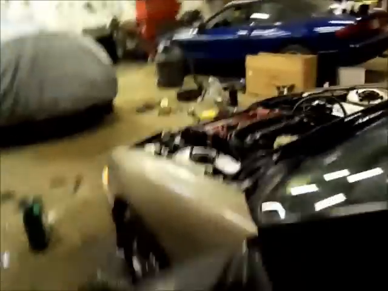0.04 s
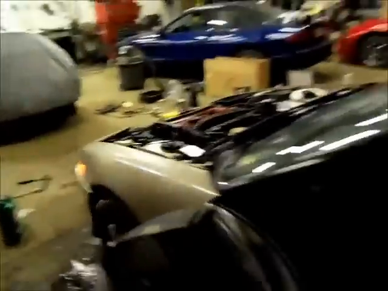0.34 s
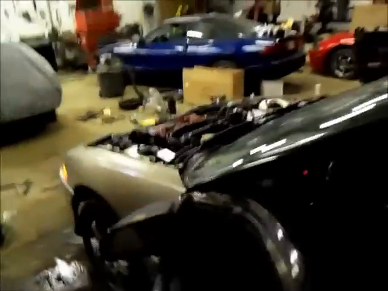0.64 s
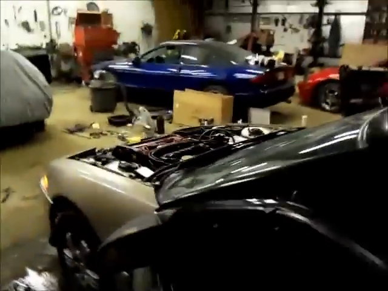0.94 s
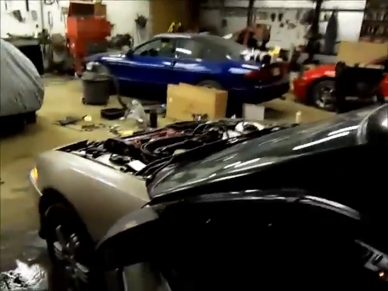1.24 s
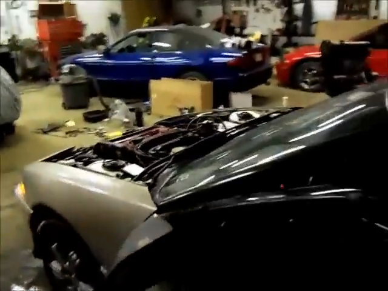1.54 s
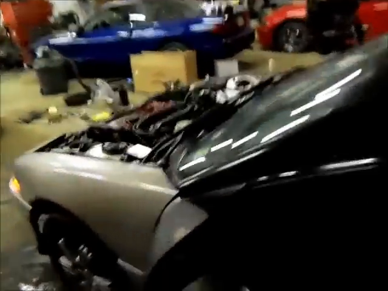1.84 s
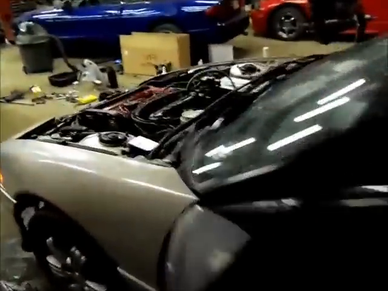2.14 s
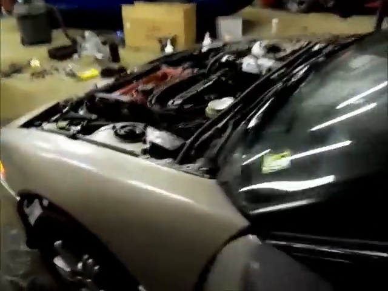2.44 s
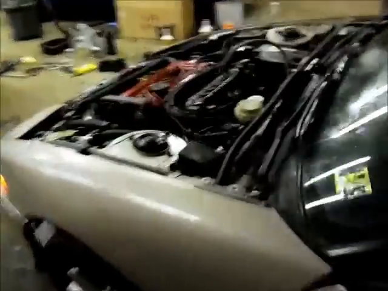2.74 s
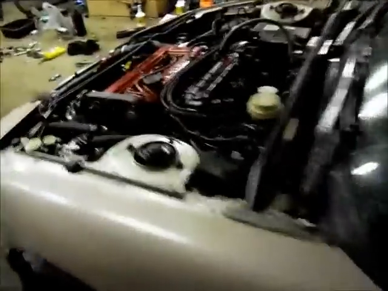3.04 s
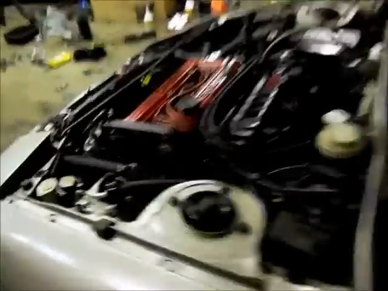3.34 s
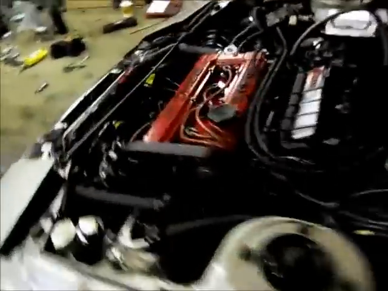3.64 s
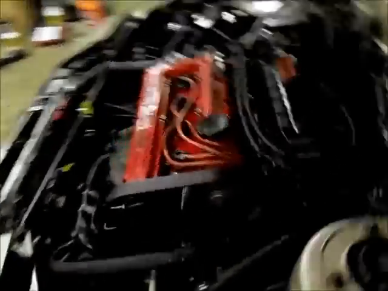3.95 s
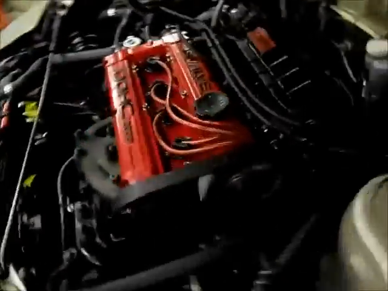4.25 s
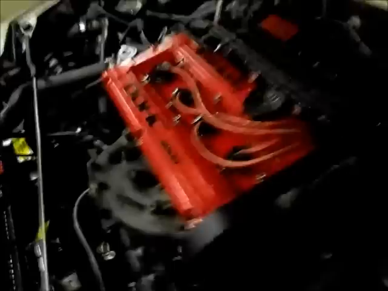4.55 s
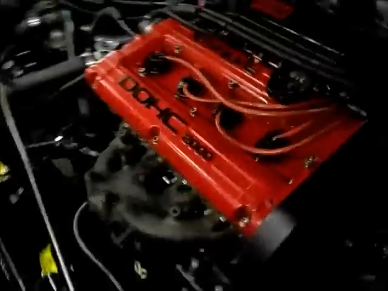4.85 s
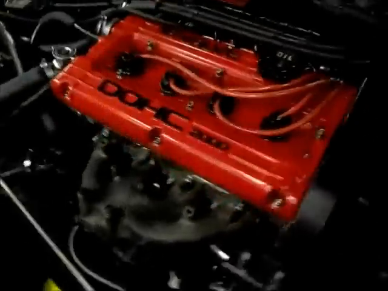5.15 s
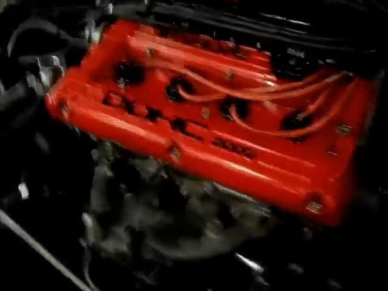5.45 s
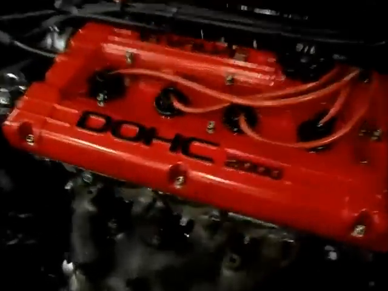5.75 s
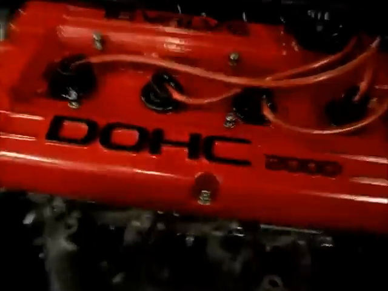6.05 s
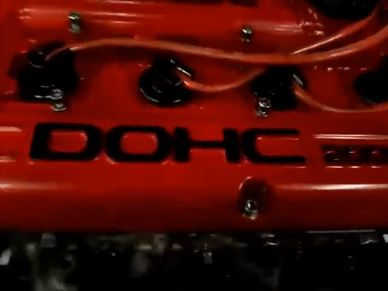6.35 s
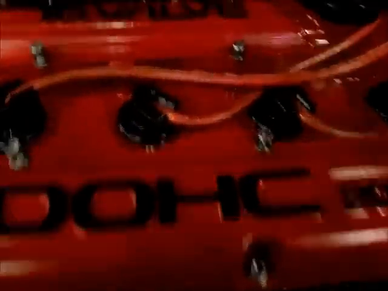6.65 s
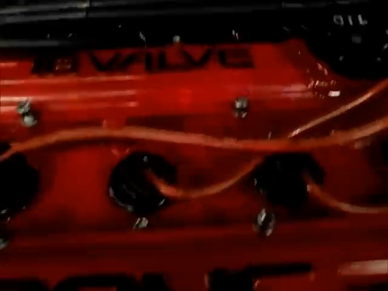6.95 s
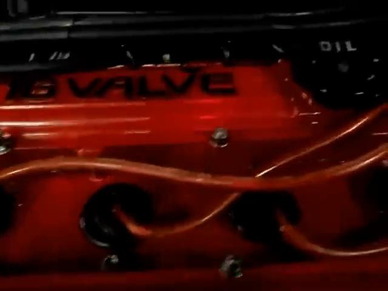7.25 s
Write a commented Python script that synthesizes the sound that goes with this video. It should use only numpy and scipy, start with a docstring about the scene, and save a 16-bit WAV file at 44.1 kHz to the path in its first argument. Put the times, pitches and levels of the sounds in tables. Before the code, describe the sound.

After one brief scuff at the start, a car engine keeps idling with a low hum and a quick, regular metallic tick that echoes slightly in a garage. The microphone walks past the wing and leans into the open engine bay, so the ticks become crisper and more direct and the belts hiss more clearly. A thin whine swells and fades halfway through, while the idle speed wavers only a little.

```python
"""Fast idle in a garage, bonnet open.

The microphone walks from the door, over the wing, to the valve cover of a four-cylinder engine.
The exhaust drones with the firings. One loose lifter ticks once per camshaft turn, ringing the cover
and echoing in the bay and the garage. The other valves patter, belts hiss and whine, the block rumbles.
Something scuffs once near the start."""
import sys
import numpy as np
from scipy import signal
from scipy.fft import rfft, irfft, next_fast_len
from scipy.io import wavfile

SR = 44100
rng = np.random.default_rng(int(sys.argv[2]) if len(sys.argv) > 2 else 0)


def store_pcm(level_fs):
    """Save levels as 16-bit WAV."""
    pcm = np.round(np.clip(level_fs, -1, 1) * 32767).astype(np.int16)
    wavfile.write(sys.argv[1], SR, np.atleast_2d(pcm).T)


N = 326781
TIME = np.arange(N) / SR
GARAGE_T60_S = 0.48
# modes of the valve cover: f/Hz, level/dB, t60/s, gain with the microphone leaning in/dB
COVER_MODES = [(512, -17.5, 0.027, -11), (747, -16, 0.035, -23), (862, -24, 0.04, 2),
               (1269, -9, 0.029, -16.5), (1346, -18.5, 0.022, 8), (1730, -10.5, 0.0061, 0.5),
               (2005, -14, 0.026, 2.5), (2256, -13.5, 0.021, 1), (2690, -1.5, 0.011, 0),
               (2890, -3.5, 0.012, 4), (3030, -4.5, 0.011, 5), (3646, -12, 0.012, -1),
               (4100, -8.5, 0.0048, 1.5), (5135, -9.5, 0.0073, -2), (5740, -18, 0.022, -3),
               (7100, -15, 0.0046, 4), (9600, -16, 0.0064, -1)]


def exhaust(cam, place, lope_db_per_place=-1.5, waver_db=2.5, wander_rad=0.38):
    """Four firings per camshaft turn; unequal cylinders add a lope at multiples of the camshaft rate."""
    # second order, booming and fading through the garage's standing wave: t/s, level/dB
    boom = [(0.0, -18.5), (0.47, -22.5), (1.28, -21.5), (2.23, -24), (3.46, -18), (4.17, -22), (4.62, -20),
            (5.61, -25), (7.16, -21.5), (7.41, -23.5)]
    # first and third order: multiple of the firing rate, level/dB at door, wing, cover
    drone_orders = [(1, -24.5, -25, -38), (3, -24, -28.5, -34.5)]
    # weaker, wavering orders: same columns
    weak_orders = [(4, -47.5, -34.5, -54), (5, -49.5, -48.5, -50), (6, -54, -44, -63), (7, -48, -52.5, -61),
                   (9, -62.5, -57.5, -84), (14, -58.5, -53, -56.5), (18, -62, -51, -84)]
    # spectrum of the uneven firing: f/Hz, level per line/dB
    lope_spectrum = [(22, -68), (33, -53), (55, -45.5), (76, -48), (100, -38.5), (120, -48), (160, -45.5),
                     (200, -57.5), (290, -58.5), (360, -82)]
    # the firings fall later against the tick as the microphone nears the cover
    firing = 2 * np.pi * (4 * cam + np.interp(place, [0, 1, 2], [.25, 0, -.1]))
    # the standing wave holds back the second order, except over the engine
    lag = np.interp(place, [0, 1, 2], [.95, .95, 0])
    drone = from_db(in_time(boom)[0]) * np.cos(2 * firing - lag)
    for order, *levels_db in drone_orders:
        drone += by_place(place, levels_db) * np.cos(round(order) * firing)
    for order, *levels_db in weak_orders:
        gain = by_place(place, levels_db) * from_db(waver_db * drift(1.13))
        drone += gain * np.cos(round(order) * firing + wander_rad * drift(4.6))
    cam_hz = (cam[-1] - cam[0]) * SR / N
    lope = 0
    for k in range(2, 33):
        if k % 4:  # only the lines between the firing orders
            phase = 2 * np.pi * (k * cam + rng.random()) + 1.12 * drift(2.04)
            lope += from_db(at_hz(lope_spectrum, k * cam_hz)) * np.cos(phase)
    return np.sqrt(2) * (drone + from_db(lope_db_per_place * place) * lope)


def lifter(cam, place, lean, strike_db=7.5, uneven_db=0.63, touch_db=-8.0, slack_s=0.00128,
           wander_db=0.6, bay_db=-3.0, bay_t60_s=0.059):
    """The cam takes up the slack with a touch, then the valve is struck; both ring the cover and bay."""
    # the tick along the walk: gain/dB at door, wing, cover
    tick_gains_db = (-31.5, -23.5, -20.5)
    # the ticking slackens for a moment: t/s, half-length/s, gain/dB
    lulls = [(.72, .25, -5), (4.28, 0.17, -2), (5.97, .1, -3)]
    times = tick_times(cam)
    force_db = strike_db + uneven_db * rng.standard_normal(len(times))
    gap_s = slack_s + 6e-5 * rng.standard_normal(len(times))
    cover = 0
    for k, (hz, mode_db, t60, lean_db) in enumerate(COVER_MODES):
        touch, strike = from_db(force_db + mode_db + rng.standard_normal((2, len(times))))
        blows = click_train(times, touch * from_db(touch_db)) + click_train(times + gap_s, strike)
        gain = from_db(lean_db * lean + wander_db * drift(0.78))
        cover += (-1) ** k * gain * ring(blows, hz, t60)
    cover *= by_place(place, tick_gains_db) * swells(lulls)
    # the pattern of reflections changes as the microphone moves
    angle = np.pi / 2 * (place + .5 * drift(0.52))
    bay = np.cos(angle) * echoes(cover, bay_t60_s, .001491)
    bay += np.sin(angle) * echoes(cover, bay_t60_s, .0025)
    # from the door the cover is hidden and mostly the reflections arrive
    direct = cover * by_place(place, [-11.0, -1.0, 0.0])
    return direct + from_db(bay_db) * bay * by_place(place, [0.0, 1.5, -2.5])


def garage_ticks(cam, place, room_db=-27.5, dull_hz=4000, pip_hz=1260, pip_db=-36.5):
    """The ticks fill the garage, dulled, wherever one stands; the engine bay adds a hollow pip."""
    times = tick_times(cam) + 0.001977
    blows = lambda db: click_train(times, from_db(db + rng.standard_normal(len(times))))
    cover = sum(ring(blows(room_db), hz, t60) * from_db(db) for hz, db, t60, _ in COVER_MODES)
    dulled = signal.sosfilt(signal.butter(2, dull_hz, fs=SR, output="sos"), cover)
    angle = 1.5 * drift(1.5)  # the pattern of the near reflections keeps shifting
    near = np.cos(angle) * echoes(dulled, .15, .002) + np.sin(angle) * echoes(dulled, .15, .003)
    room = near + from_db(-3.0) * echoes(dulled, GARAGE_T60_S, .012)
    pip = echoes(ring(blows(pip_db), pip_hz, t60=.07), t60=.04, delay_s=.002)
    return room * by_place(place, [0.0, -1.0, -5.0]) + pip * by_place(place, [0.0, 5.0, -12.0])


def valve_patter(cam, share, decay_turns=0.029):
    """Each quieter valve closes with a brief surge: a gain that pulses a share of a noise's power."""
    # valve closings: angle after the tick/camshaft turns, relative strength/dB
    closings = [(.21, 22.5), (0.291, 27), (.43, -15), (.53, -8), (.605, 27.5), (.74, -25), (0.841, 7),
                (.93, 29)]
    power = sum(from_db(db) ** 2 * np.exp(-((cam - turn) % 1) / decay_turns) for turn, db in closings)
    return np.sqrt(np.maximum(1 + share * (power / power.mean() - 1), 0))


def belt_rush(cam, place, belt_gain, hiss_gain, belt_db=-3.5, hiss_db=0.5, beam_above_hz=8000):
    """The belts rush and hiss, pulsing with the valves; the top of the hiss is the most directional."""
    # colour of the rush: f/Hz, relative density/dB
    belt_spectrum = [(1000, -18.5), (1500, -9), (1850, -2), (2200, -5), (2450, -0.5), (2700, -6),
                     (3050, -4), (3450, -12.5), (4300, -23)]
    # colour of the hiss: same columns
    hiss_spectrum = [(2500, -2), (3600, -4), (4500, 2.5), (5800, 1.5), (7200, -1), (8600, -3.5),
                     (9800, -2.5), (11500, -4.5), (13500, -4.5), (16000, -2.5)]
    # beams of top hiss that the microphone crosses: t/s, half-length/s, gain/dB
    beams = [(4.4, 1, 4), (6.75, 0.35, 2)]
    hiss = coloured(hiss_spectrum)
    top = signal.sosfiltfilt(signal.butter(2, beam_above_hz, "high", fs=SR, output="sos"), hiss)
    hiss += top * (by_place(place, [-2.0, 0.0, -1.3]) * swells(beams) - 1)
    belt = from_db(belt_db + 1.6 * drift(15)) * coloured(belt_spectrum)
    hiss *= from_db(hiss_db + .5 * drift(7.9))
    rush = belt_gain * belt * valve_patter(cam, share=.065)
    rush += hiss_gain * hiss * valve_patter(cam, share=.18)
    # close up, a reflection whose path keeps changing makes the rush swish
    detour_s = .0013 + .00012 * drift(.7)
    bounce = .1 * place
    return (rush + bounce * np.interp(TIME - detour_s, TIME, rush)) / np.sqrt(1 + bounce ** 2)


def block_rumble(cam, place, level_db=-4.5):
    """The block rumbles, pulsing with the valves; the open bay sounds hollow from over the wing."""
    # colour of the rumble: f/Hz, relative density/dB
    block_spectrum = [(25, 2), (120, 12), (250, 0.5), (370, -5), (530, 2.5), (700, -2), (920, -7.5),
                      (1200, -1), (1500, -20), (2200, -23)]
    # brief low swells of handling or footstep noise: t/s, half-length/s, gain/dB
    handling_swells = [(.15, 0.25, 6.5), (2.7, 0.65, 3)]
    block = coloured(block_spectrum)
    hollow = by_place(place, [-15.0, -6.0, -11.0]) * resonant(hz=710, width_hz=540)
    gain = swells(handling_swells) * from_db(level_db + drift(8.7))
    return gain * valve_patter(cam, share=.18) * (block + hollow)


def ringing_metal(cam, place):
    """The engine keeps metal parts ringing, each with a beam that the microphone passes through."""
    # beam and part: t/s, half-length/s, gain/dB, f/Hz, width/Hz, level/dB at door, wing, cover
    parts = [(4.45, .25, 6, 2080, 320, -47, -43, -43.5), (5.35, .3, 3, 4380, 190, -54, -45.5, -46),
             (3.7, .3, 12, 5900, 110, -66, -53, -50), (6.5, .3, 16, 6620, 90, -69, -64, -57.5),
             (5.1, .25, 16, 6750, 160, -70, -66, -60)]
    metal = sum(by_place(place, levels_db) * swell(t, half_s, db) * resonant(hz, width_hz)
                for t, half_s, db, hz, width_hz, *levels_db in parts)
    return valve_patter(cam, share=.18) * metal


def accessory_whine(cam, place, flutter_db=3.5, slip_rad=0.9):
    """Two tones tied to engine speed, blurred by belt slip, loudest as the microphone meets their beams."""
    # beam and tone: t/s, half-length/s, gain/dB, multiple of firing rate, level/dB at door, wing, cover
    tones = [(4.2, 0.53, 7.5, 12, -56, -57, -55), (3.76, 0.55, 13, 24, -71, -59.5, -53)]
    firing = 2 * np.pi * 4 * cam
    whine = 0
    for t, half_s, db, order, *levels_db in tones:
        gain = by_place(place, levels_db) * swell(t, half_s, db) * from_db(flutter_db * drift(14))
        whine += gain * np.cos(round(order) * firing + slip_rad * drift(12))
    return np.sqrt(2) * whine


def scuff(rough_db=1.5, room_db=-10.0):
    """A short rough slide with a hollow body, answered by the garage."""
    # envelope of the slide: t/s, level/dB
    envelope = [(.29, -51), (.318, -38), (.333, -27), (.345, -25.5), (.362, -28), (.385, -36), (.43, -47),
                (.5, -75)]
    # its hollow resonances: f/Hz, width/Hz, level/dB
    resonances = [(334, 440, -5.5), (710, 59, -15), (840, 180, -5), (1140, 120, -22), (1640, 110, -9)]
    # its grit: f/Hz, relative density/dB
    grit = [(400, -16), (2200, 4.5), (2800, -1.5), (5500, 3), (9000, -1.5), (14000, -7)]
    body = sum(from_db(db) * resonant(hz, width_hz) for hz, width_hz, db in resonances)
    slide = from_db(in_time(envelope)[0] + rough_db * drift(160)) * (body + coloured(grit))
    return slide + from_db(room_db) * echoes(slide, GARAGE_T60_S, 0.01)


def cam_turns(first_tick_s=.0156):
    """Camshaft angle in turns since the first tick; it runs at half the crankshaft's speed."""
    # the idle hunts a little, then sags and recovers: t/s, crankshaft speed/rpm
    idle_speed = [(0.0, 1282.8), (0.75, 1324.6), (1.5, 1295.4), (1.75, 1344.4), (2.75, 1313.2),
                  (3.0, 1349.0), (3.75, 1312.6), (4.0, 1352.2), (5.0, 1254.0), (5.25, 1253.0),
                  (6.0, 1213.9), (6.25, 1220.6), (6.75, 1286.9), (7.41, 1285.4)]
    turns = np.cumsum(in_time(idle_speed)[0]) / (2 * 60 * SR)
    return turns - np.interp(first_tick_s, TIME, turns)


def tick_times(cam):
    """The moments at which the camshaft completes a turn."""
    return np.interp(np.arange(int(cam[-1]) + 1), cam, TIME)


def from_db(db):
    """Decibels to gain."""
    return 10 ** (np.asarray(db) / 20)


def rms_one(x):
    """Scale to unit rms."""
    return x / np.sqrt(np.mean(x ** 2) + 1e-20)


def in_time(rows):
    """Each column of a curve, sample by sample."""
    times, *columns = np.transpose(rows)
    return [np.interp(TIME, times, column) for column in columns]


def at_hz(spectrum, hz):
    """Read a spectrum on a log-frequency axis."""
    points_hz, levels_db = np.transpose(spectrum)
    return np.interp(np.log(hz + 1e-9), np.log(points_hz), levels_db)


def by_place(place, levels_db):
    """Gain along the walk, from the levels at door, wing and cover."""
    return from_db(np.interp(place, np.arange(len(levels_db)), levels_db))


def swell(centre_s, half_s, peak_db):
    """A gain that moves smoothly to a peak or dip and back."""
    return from_db(peak_db * np.exp(-((TIME - centre_s) / half_s) ** 2))


def swells(rows):
    """The combined gain of a table of swells."""
    return np.prod([swell(*row) for row in rows], axis=0)


def drift(rate_hz):
    """Smooth random wander, rms 1."""
    step, settle = 40, 2000  # samples per point, points for the filter to settle
    r = np.exp(-2 * np.pi * rate_hz * step / SR)
    slow = signal.lfilter([1], [1, -2 * r, r * r], rng.standard_normal(N // step + settle + 2))[settle:]
    return np.interp(np.arange(N) / step, np.arange(len(slow)), rms_one(slow))


def coloured(spectrum):
    """Noise of a given colour, rms 1."""
    size = next_fast_len(N)
    gain = from_db(at_hz(spectrum, np.fft.rfftfreq(size, 1 / SR)))
    return rms_one(irfft(rfft(rng.standard_normal(size)) * gain, size)[:N])


def resonant(hz, width_hz):
    """Noise in one resonance, rms 1."""
    r, w = np.exp(-np.pi * width_hz / SR), 2 * np.pi * hz / SR
    return rms_one(signal.lfilter([1, 0, -1], [1, -2 * r * np.cos(w), r * r], rng.standard_normal(N)))


def ring(clicks, hz, t60):
    """A unit click sets a sine of height 1 ringing."""
    r, w = from_db(-60 / (t60 * SR)), 2 * np.pi * hz / SR
    return signal.lfilter([0, np.sin(w)], [1, -2 * r * np.cos(w), r * r], clicks + 1e-18)


def click_train(times, sizes):
    """Single-sample blows at the given times."""
    at = np.round(times * SR).astype(int)
    inside = (at >= 0) & (at < N)
    return np.bincount(at[inside], sizes[inside], N)


def echoes(x, t60, delay_s):
    """Dense reflections that arrive after a delay and die away, with an even colour and unit energy."""
    t = np.arange(int(t60 * SR)) / SR
    decay = from_db(-60 * t / t60)
    tail = rng.standard_normal(len(t))
    for _ in range(3):  # even out the colour
        spectrum = rfft(tail * decay)
        tail = irfft(spectrum / np.abs(spectrum), len(t)) / np.maximum(decay, .05)
    tail *= decay
    reflections = signal.fftconvolve(x, tail / np.linalg.norm(tail))
    return np.r_[np.zeros(int(delay_s * SR)), reflections][:N]


def scene():
    """One microphone walks in from the door; everything on the engine follows the camshaft."""
    # microphone path: t/s, place (0 door, 1 wing, 2 and up valve cover), lean over the cover (0-1)
    walk = [(0, 0.062, 0.51), (1.7, 0.09, 0), (3.1, 0.995, 0.39), (4.1, 1.23, 0), (5.3, 1.68, 0.18),
            (5.95, 2.5, 0.48), (6.15, 2.3, 0.99), (7.41, 2.8, 1)]
    # running noise, a row each for block, belts and hiss: gain/dB at door, wing, cover
    running_gains_db = [(-42, -36.5, -39), (-40.5, -34, -38), (-44.5, -36, -35.5)]
    cam = cam_turns()
    place, lean = in_time(walk)
    block_gain, belt_gain, hiss_gain = [by_place(place, row) for row in running_gains_db]
    ticking = lifter(cam, place, lean) + garage_ticks(cam, place)
    tones = exhaust(cam, place) + accessory_whine(cam, place)
    running = ringing_metal(cam, place) + block_gain * block_rumble(cam, place)
    running += belt_rush(cam, place, belt_gain, hiss_gain)
    return (tones + ticking + running + scuff())[None]


def record(dry, cutoff_hz=14000):
    """The top is cut steeply."""
    return signal.sosfilt(signal.ellip(12, .1, 80, cutoff_hz, fs=SR, output="sos"), dry)


dry = scene()
out = record(dry)
store_pcm(out)
```